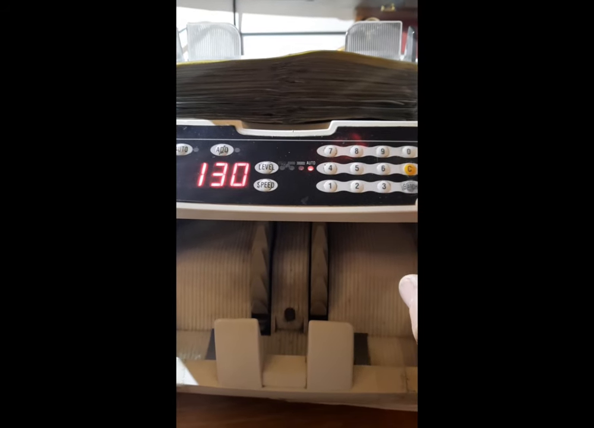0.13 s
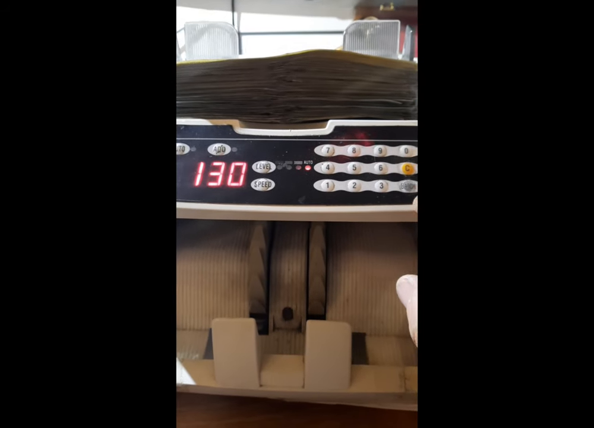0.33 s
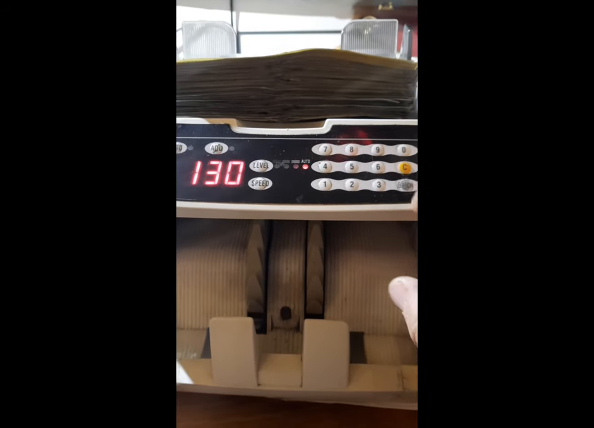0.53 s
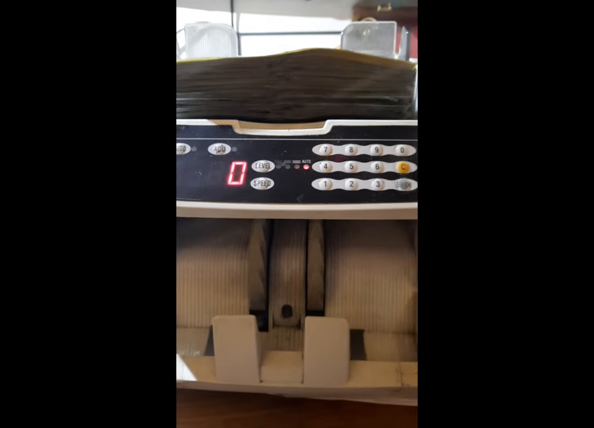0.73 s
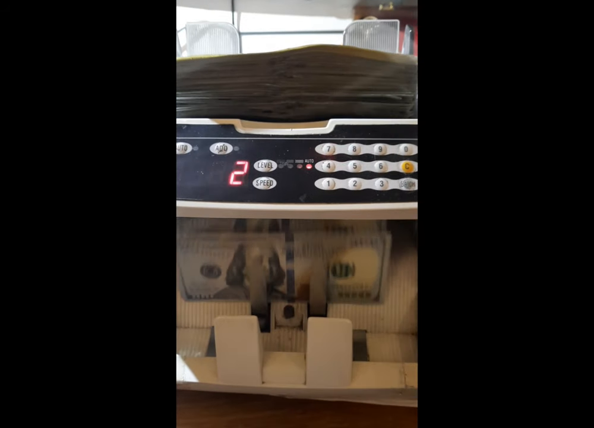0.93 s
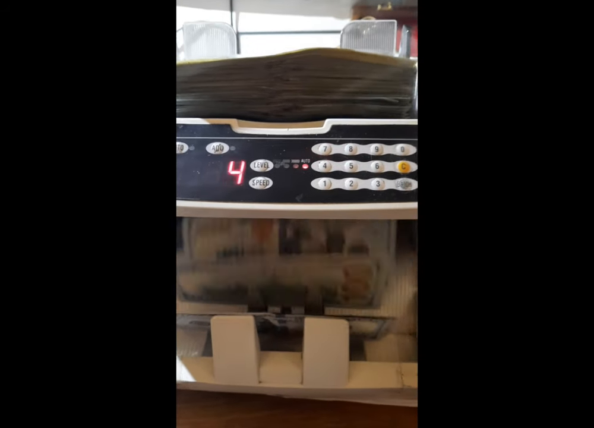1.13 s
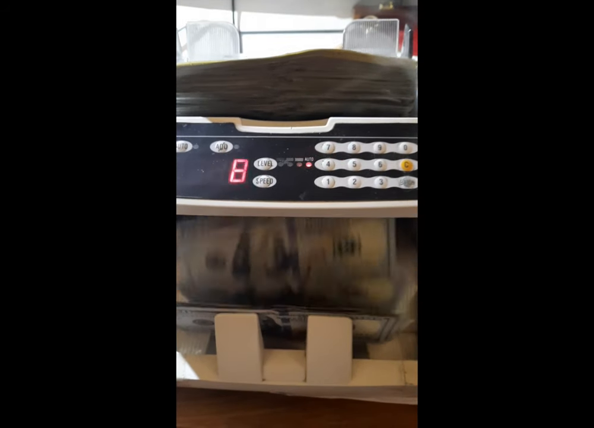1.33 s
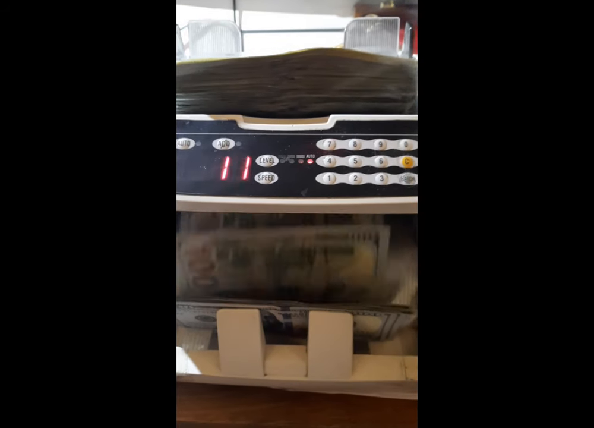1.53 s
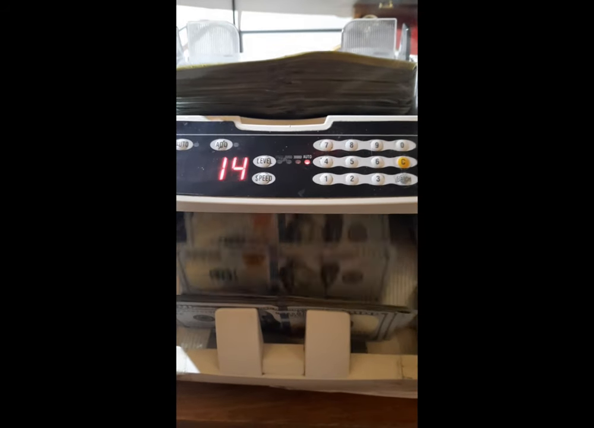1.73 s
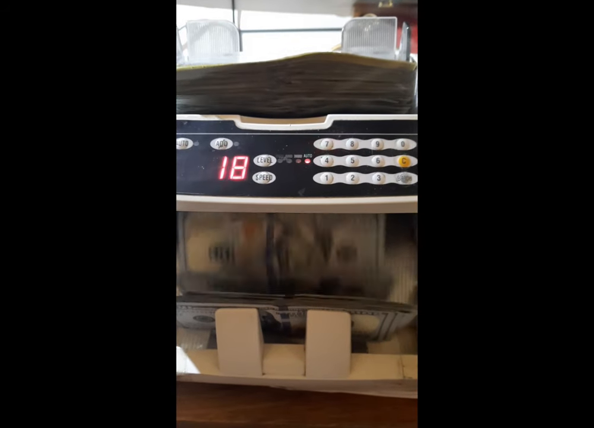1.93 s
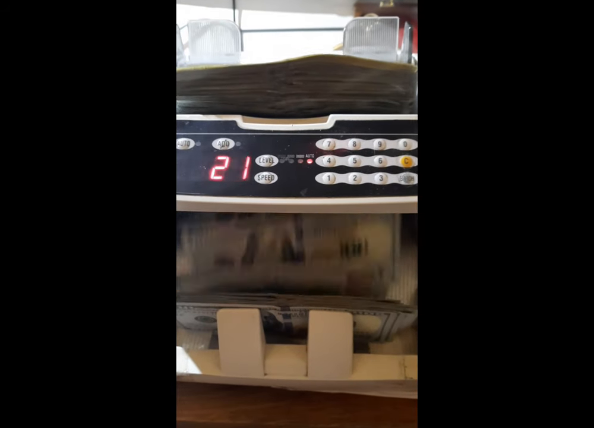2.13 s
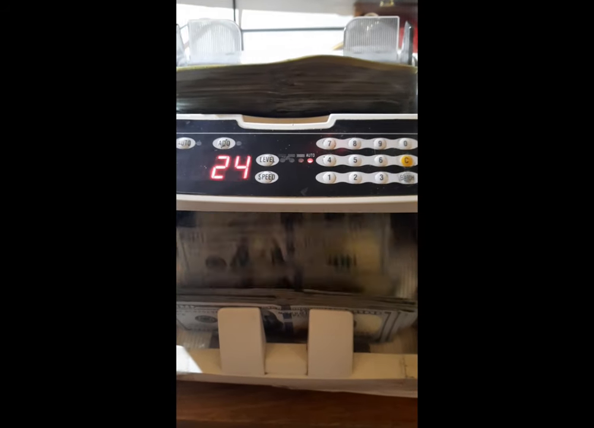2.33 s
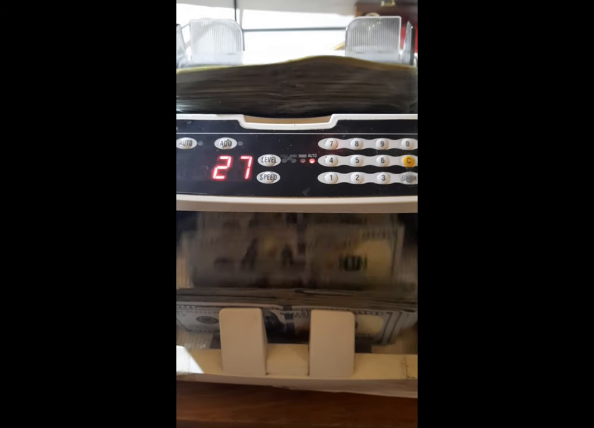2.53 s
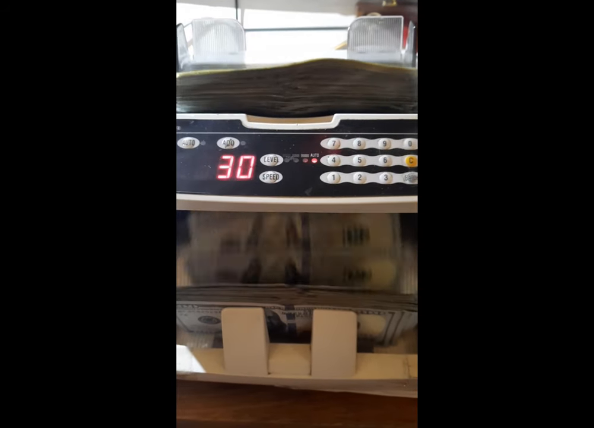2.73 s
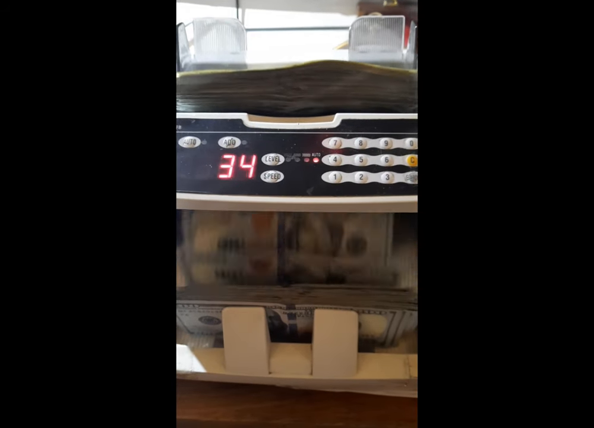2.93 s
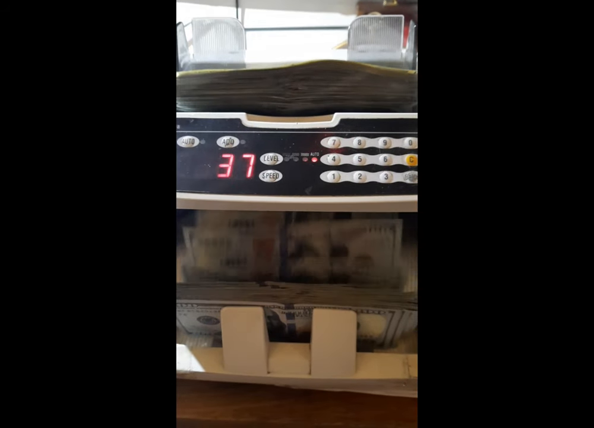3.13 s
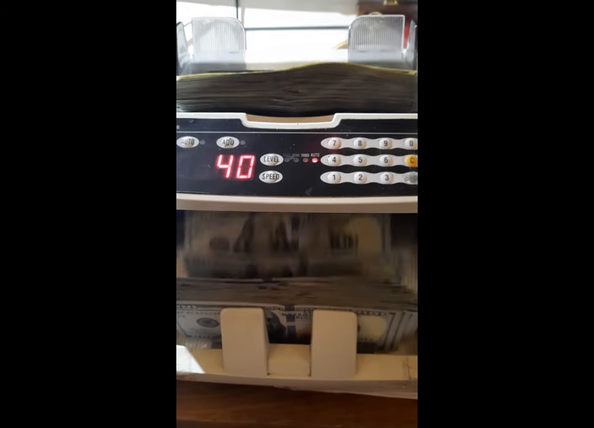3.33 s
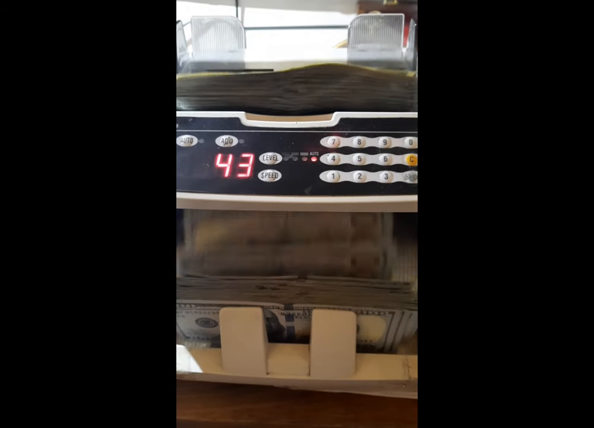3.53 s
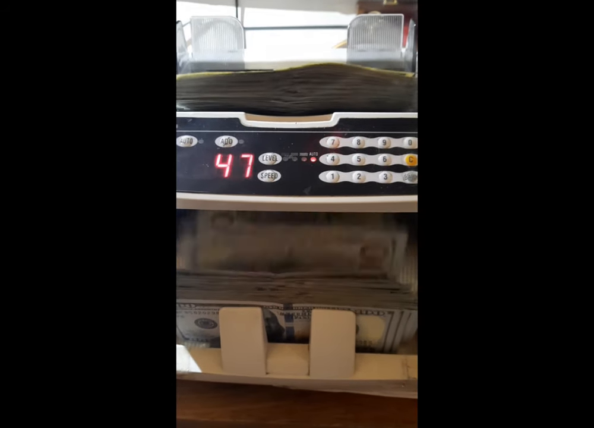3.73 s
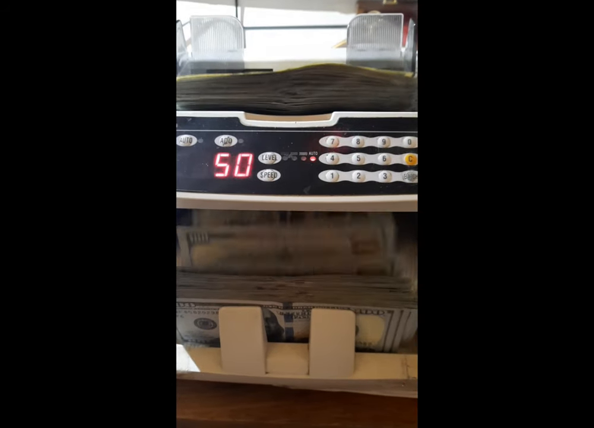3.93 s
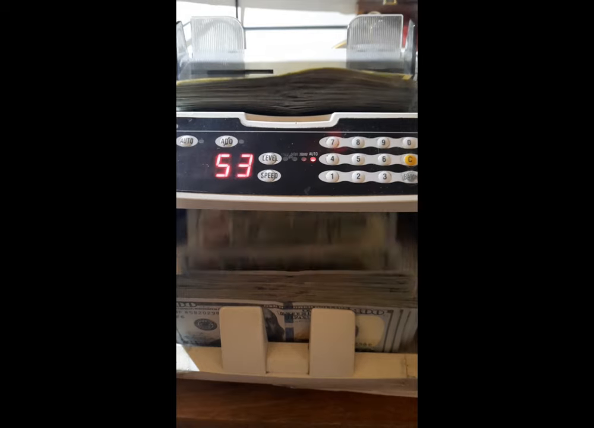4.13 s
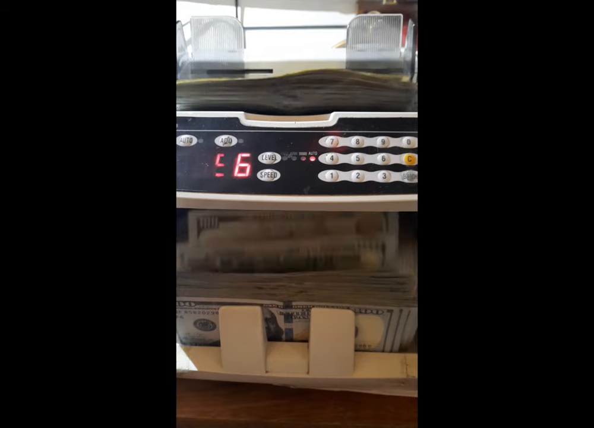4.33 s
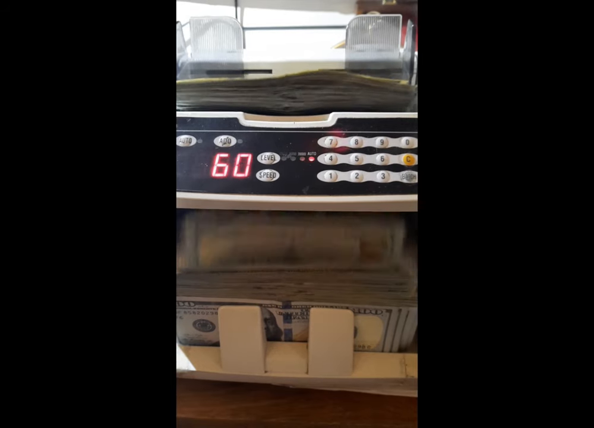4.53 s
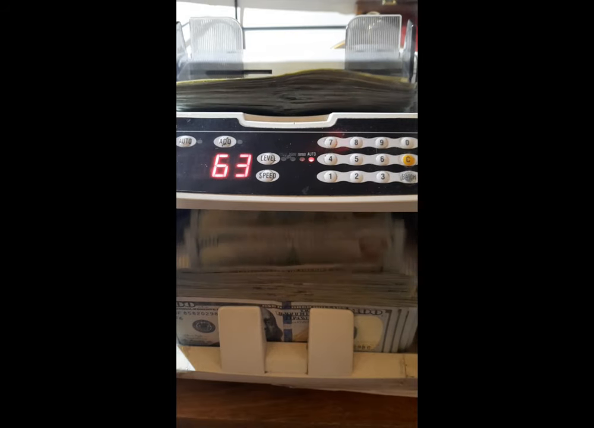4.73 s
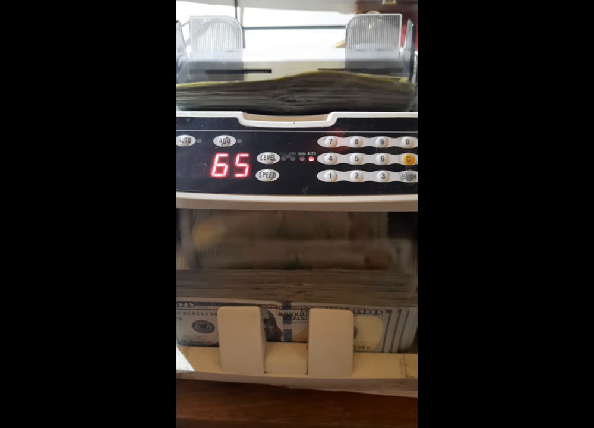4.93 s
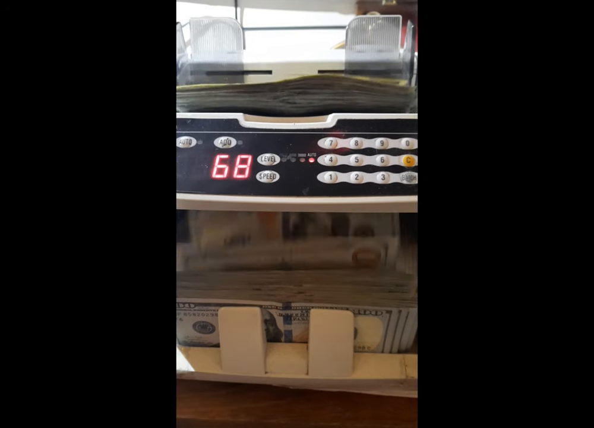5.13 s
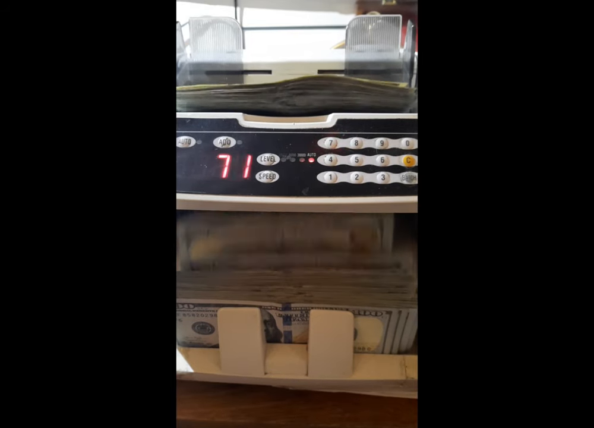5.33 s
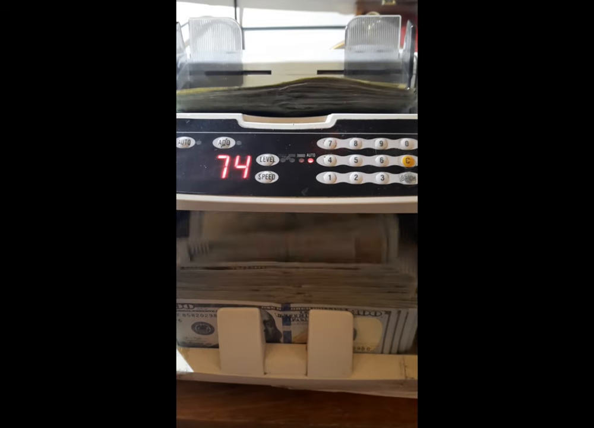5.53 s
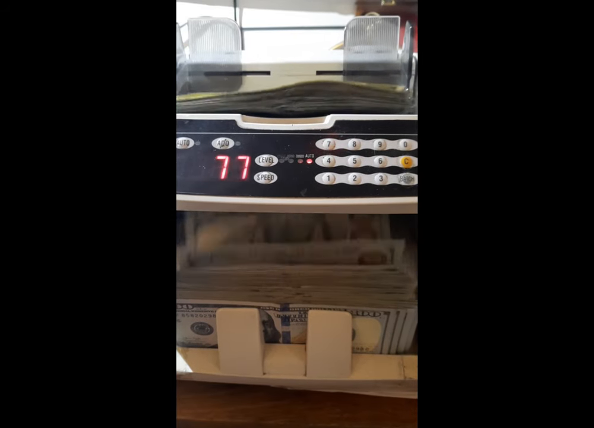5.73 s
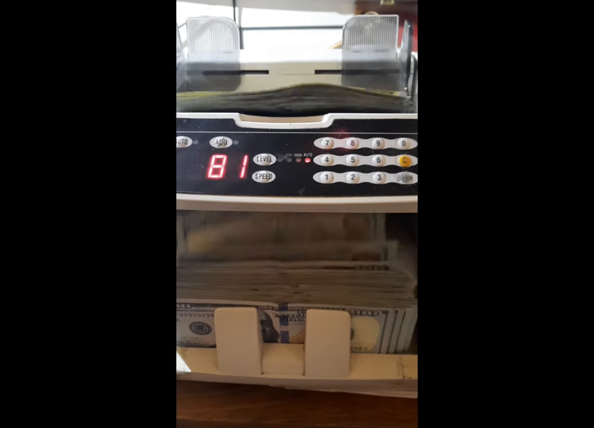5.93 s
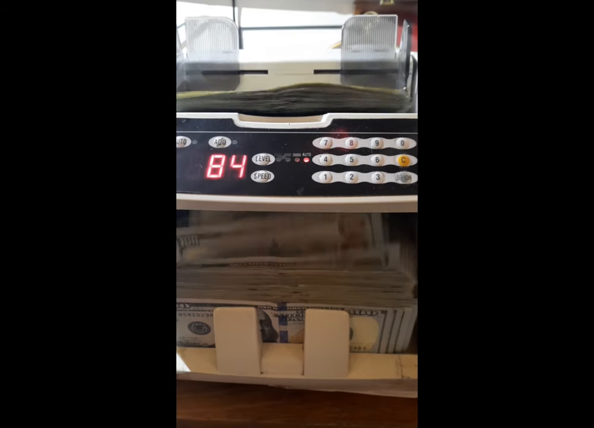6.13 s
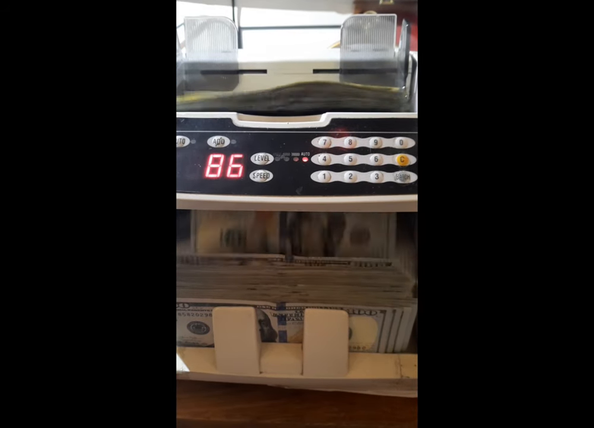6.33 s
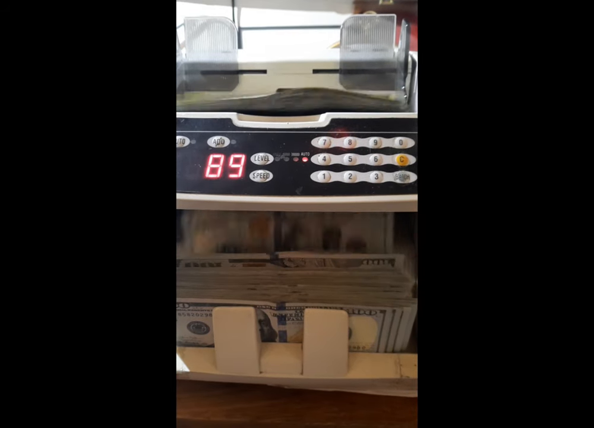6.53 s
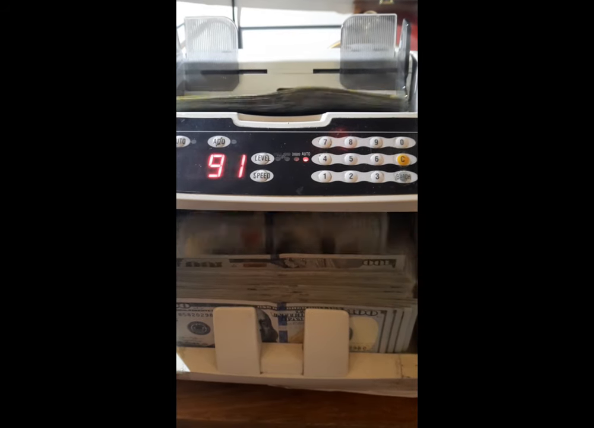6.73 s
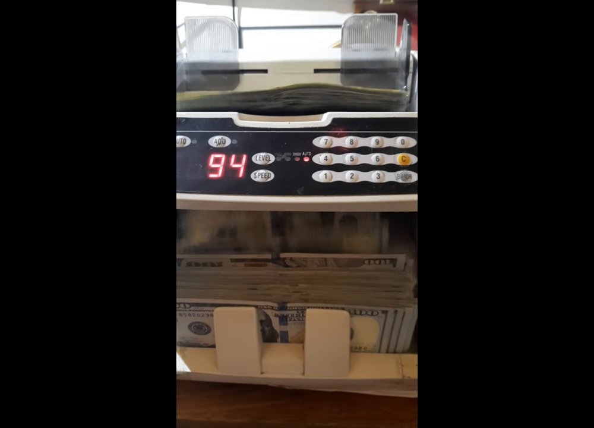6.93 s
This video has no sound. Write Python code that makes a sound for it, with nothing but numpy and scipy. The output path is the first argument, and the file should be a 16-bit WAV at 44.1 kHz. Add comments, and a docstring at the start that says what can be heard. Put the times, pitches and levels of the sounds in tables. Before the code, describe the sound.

A banknote counter runs on a desk, close to a pair of microphones in a quiet room. After a faint button click, the motor starts and the feed knocks as it bites into the stack. About sixteen bills a second flick through the rollers with a papery hiss, light knocks and small rubber squeaks, while the case hums and rattles. The rhythm holds to the end, broken by two very short dropouts midway.

```python
"""A banknote counter, close to a pair of microphones on a desk in a quiet room.
A key clicks, the drive spins up and rattles the plastic case, and about sixteen notes a second run through.
Each note swishes through the rollers and snaps free; between notes the feed knocks, ticks and squeaks.
The paper hiss sags when the feed misses; twice the sound drops out."""
import sys
import numpy as np
from scipy import signal
from scipy.fft import rfft, irfft, next_fast_len
from scipy.io import wavfile
from scipy.ndimage import uniform_filter1d

SR = 44100
rng = np.random.default_rng(int(sys.argv[2]) if len(sys.argv) > 2 else 0)


def transcribe(u):
    """Save the signal u as a 16-bit wav file named by the first command-line argument.

    u: samples, shape (n,) or (channels, n), limited to [-1, 1]; the rate is SR.
    q: integer samples, one column per channel.
    """
    v = np.clip(np.atleast_2d(u).T, -1, 1)
    q = np.round(v * 32767).astype(np.int16)
    wavfile.write(sys.argv[1], SR, q)


N = 307818
T = np.arange(N) / SR
PADDED = next_fast_len(N + 16384, True)
FREQ = np.maximum(np.fft.rfftfreq(PADDED, 1 / SR), 1)
ROLLER_HZ = 16.25

# Low panel resonances of the case. Each row: frequency in Hz, width in Hz, relative level in dB.
CASE_MODES = [(138.6, 23, -8.5), (188, 18, -16), (253, 14, -37), (296, 18, -6), (336.8, 47, 0.5),
              (372.8, 37, 0.5), (409, 16, -11.5), (563, 48, -11.5)]
# Resonances of the feed frame and chute. Each row: frequency in Hz, width in Hz, relative level in dB.
FRAME_MODES = [(377, 62, -6), (614, 57, -6), (867, 18, -10.5), (975, 121, 2), (1428, 153, -3.5),
               (1834, 128, 2), (2630, 90, -9), (4600, 680, -25), (6200, 600, -19)]
# Pace of the roller, which lets a note go on each whole turn. Each row: turns done, time in seconds.
ROLLER_PACE = [(0, 0.886), (1, 0.941), (9, 1.444), (17, 1.924), (24, 2.371), (31, 2.796), (36, 3.117),
               (41, 3.413), (51, 4.025), (53, 4.181), (58, 4.49), (59, 4.56), (60, 4.615), (70, 5.237),
               (84, 6.092), (86, 6.208), (93, 6.637), (99, 6.993)]
# The turns on which the feed finds no note.
MISSED_TURNS = [2, 66, 75, 90, 96, 98]


def undb(db):
    """Decibels to gain."""
    return 10 ** (np.asarray(db) / 20)


def unit(x):
    """Scale to rms 1."""
    return x / np.sqrt(np.mean(x ** 2))


def pan(x, left_db):
    """Lean a sound to the left or right."""
    return x * undb(np.array([[left_db], [-left_db]]) / 2)


def curve(points):
    """Join (Hz, value) points on a log-frequency axis."""
    hz, value = np.transpose(points)
    return np.interp(np.log(FREQ), np.log(hz), value)


def filtered(x, gain):
    """Apply a frequency response."""
    return irfft(rfft(x, PADDED) * gain, PADDED)[..., :N]


def walk(rate_hz):
    """A smooth random wander of rms 1."""
    return unit(filtered(rng.standard_normal(N), np.exp(-(FREQ / rate_hz) ** 2)))


def noise():
    """Noise at two microphones: alike in both from 100 to 350 Hz, mostly unrelated in the treble."""
    # Each row: frequency in Hz, correlation between the microphones.
    likeness = [(30, -0.8), (100, 1), (350, 1), (460, 0.71), (550, 0.31), (750, 0.58), (1300, 0.1),
                (1650, 0.27), (1880, 0.74), (2300, -0.017), (2900, -0.52), (4600, 0.17), (6500, -0.31),
                (9000, -0.015)]
    alike = np.clip(curve(likeness), -.99, .99)
    mid, side = filtered(rng.standard_normal((2, N)), np.sqrt([1 + alike, 1 - alike]))
    return unit(np.array([mid + side, mid - side]))


def crackle(spread_db, size=24):
    """Noise broken into half-millisecond grains of uneven strength."""
    strengths = np.clip(rng.standard_normal(N // size + 1), -2.5, 2.5)
    grains = np.repeat(strengths, size)[:N]
    return unit(noise() * undb(spread_db * grains))


def colour(x, points):
    """Causal filter through (Hz, dB) points that keeps the power of white noise."""
    cepstrum = irfft(np.log(unit(undb(curve(points)))), PADDED)
    cepstrum[1:PADDED // 2] *= 2
    cepstrum[PADDED // 2 + 1:] = 0
    return filtered(x, np.exp(rfft(cepstrum)))


def ring(x, modes):
    """Pass through (Hz, width, dB) resonances, keeping the power of white noise."""
    gain = sum(undb(db) / (1 + 1j * hz / width * (FREQ / hz - hz / FREQ)) for hz, width, db in modes)
    return filtered(x, gain / np.sqrt(np.mean(abs(gain) ** 2)))


def even(x, size=300):
    """Hold a rattle at constant power, so that only the force behind it sets its level."""
    return x / np.sqrt(uniform_filter1d(np.mean(x ** 2, axis=0), size) + 1e-9)


def taps(times, dbs):
    """One sharp push for each contact."""
    return np.bincount((np.asarray(times) * SR).astype(int), undb(dbs), N)


def bursts(times, dbs, rise, fall, size=4000):
    """Envelope of contacts that swell and die away exponentially; rise and fall are in seconds."""
    power = np.zeros(N)
    for s, db in zip(times, dbs):
        near = slice(max(int(s * SR) - size, 0), int(s * SR) + size)
        age = T[near] - s
        power[near] += undb(db) ** 2 * np.exp(2 * np.where(age < 0, age / rise, -age / fall))
    return np.sqrt(power)


def turn_time(turn):
    """The moment at which the roller reaches a given turn."""
    return np.interp(turn, *np.transpose(ROLLER_PACE))


def note_turns():
    """The turns that carry a note."""
    return np.setdiff1d(np.arange(ROLLER_PACE[-1][0]), MISSED_TURNS)


def each_turn(turns, phase, db, scatter_db, jitter_s):
    """Times and levels of a contact that comes a share (phase) into each turn, never quite alike."""
    late, strong = np.clip(rng.standard_normal((len(turns), 2)), -2, 2).T
    times = turn_time(turns + phase) + jitter_s * late
    return np.clip(times, 0, T[-1]), db + scatter_db * strong


def room_tone():
    """A low, steady murmur of air fills the room."""
    # Each row: frequency in Hz, relative level in dB.
    air_spectrum = [(15, -43), (25, -19), (43, -14), (108, -3.5), (200, -16), (242, -4.5), (301, -1),
                    (344, -14.5), (489, -17), (545, -26), (911, -32), (7920, -41.5), (9320, -39),
                    (14800, -39), (16000, -39)]
    return colour(noise(), air_spectrum) * undb(-65.5)


def start_key():
    """A fingertip brushes the panel and the key clicks."""
    brush = noise() * bursts([.45], [-76], rise=0.018, fall=.04, size=8000)
    click = noise() * bursts([.578], [-65], rise=.001, fall=.008)
    return (colour(brush, [(500, -20), (1500, 0), (3000, -2), (5000, -14), (16000, -22)])
            + colour(click, [(200, 3.5), (1500, -3), (4500, -14), (16000, -22)]))


def case_thuds():
    """Every note jolts the case and rings its panels; the first notes thump through the rollers."""
    # The start key, the drive engaging and heavy catches. Each row: time in seconds, strength in dB.
    catches = [(.579, -49), (.697, -38), (0.934, -22), (1.014, -21), (1.117, -19), (1.221, -16.5),
               (2.138, -14.5), (2.184, -17.5), (2.565, -12.5), (4.689, -16), (5.855, -13.5)]
    # Each row: frequency in Hz, relative level in dB.
    thump_spectrum = [(20, -24), (60, -5.5), (110, -2), (220, -1), (600, -32), (16000, -68)]
    light = each_turn(note_turns(), phase=0.041, db=-28, scatter_db=3, jitter_s=.003)
    jolts = taps(*np.hstack([light, np.transpose(catches)]))
    soft_jolts = filtered(jolts, np.exp(-(FREQ / 480) ** 2))
    thump = noise() * bursts([.931], [-26], rise=0.0037, fall=0.015)
    return ring(soft_jolts, CASE_MODES) * undb(20.5) + colour(thump, thump_spectrum)


def drive(drive_db, whine_db):
    """Gears and belt shake the case; the motor hums, and whines as it takes up the load."""
    # Swell of the hum. Each row: time in seconds, relative level in dB.
    hum_swell = [(0.85, -55), (0.91, -42), (1.33, -39.4), (1.75, -55), (1.93, -37.5), (3.07, -43),
                 (3.13, -50), (3.31, -42.6), (3.85, -53), (3.97, -38), (5.05, -41.5), (5.29, -35),
                 (5.77, -41), (5.83, -31), (5.89, -42.5), (6.91, -39.5)]
    # Each row: multiple of the roller speed, relative level in dB.
    hum_partials = [(7, -9), (8, 0), (21, -3), (24, -4), (29, -6.5), (37, -6)]
    # Each row: frequency in Hz, relative level in dB.
    rumble_spectrum = [(20, -47), (38, -38), (50, -27), (80, -11), (110, 2.5), (170, 3), (250, -5),
                       (500, -4), (1500, -35), (16000, -61)]
    # Each row: frequency in Hz, width in Hz, relative level in dB.
    whine_modes = [(1250, 35, 9), (1860, 86, 1.5), (2370, 160, -12)]
    turns = np.cumsum(ROLLER_HZ * (1 + .025 * walk(10))) / SR
    teeth = noise()[:, (turns % 1 * SR / ROLLER_HZ).astype(int)]  # the same roughness on every turn
    shake = (crackle(spread_db=2) + 0.49 * teeth) * undb(drive_db + walk(51))
    hum_db = np.interp(T, *np.transpose(hum_swell))
    hum = sum(undb(hum_db + db + 1.3 * walk(11)) * np.sin(2 * np.pi * k * turns)
              for k, db in hum_partials)
    rumble = colour(noise(), rumble_spectrum) * undb(-42)
    whine = ring(noise(), whine_modes) * undb(whine_db)
    return ring(shake, CASE_MODES) * undb(-30.5) + (hum + rumble) * undb(drive_db) + whine


def paper(rub_db):
    """Notes rub along their path, swish out of the rollers, snap against the frame and land."""
    # Slow course of the snaps and swishes. Each row: time in seconds, relative level in dB.
    snap_levels = [(0.89, -20.5), (1.5, -24.5), (2.73, -24.4), (3.05, -23), (3.35, -26), (3.72, -23),
                   (4.49, -25), (4.61, -22.5), (5.72, -26), (5.79, -24.0), (6.7, -28), (6.87, -22.5)]
    swish_levels = [(0.89, -26.0), (1.45, -31.5), (1.69, -26.5), (3.66, -25.5), (3.78, -21.5), (3.84, -38),
                    (4.03, -24.5), (4.25, -32), (4.86, -26.3), (5.05, -29.5), (6.33, -26.5), (6.87, -31.5)]
    # Stiff notes crack sharply as they leave. Each row: time in seconds, strength in dB.
    cracks = [(3.052, -23), (3.657, -23), (4.025, -20), (4.802, -25), (6.753, -26)]
    # Each row: frequency in Hz, relative level in dB.
    rub_spectrum = [(200, -23), (600, -4.5), (950, 7.5), (1200, 3.5), (1500, 8.5), (2000, 3), (2350, -0.5),
                    (2650, 3.5), (3200, -4.5), (4600, -3), (8500, -4), (9300, -11), (10500, -9.5),
                    (12000, -3.5), (14000, -2), (16000, -9.5)]
    swish_spectrum = [(500, -20.5), (2000, 3.5), (3200, 1.5), (4600, 5), (6000, 1.5), (8500, 2),
                      (9500, -11.5), (10700, -3), (12000, 3), (16000, -7)]
    snaps, uneven_db = each_turn(note_turns(), phase=0, db=0, scatter_db=1.45, jitter_s=.0004)
    snap_db = np.interp(snaps, *np.transpose(snap_levels)) + uneven_db
    swish_db = np.interp(snaps, *np.transpose(swish_levels)) + uneven_db
    # the rubbing sags 35 ms after each missed note
    sag_db = -8.5 * sum(np.exp(-((T - miss - 0.035) / 0.023) ** 2) for miss in turn_time(MISSED_TURNS))
    # just after a snap the rollers are empty for a moment
    gap = bursts(snaps + 0.016, np.zeros_like(snaps), rise=0.0077, fall=0.0092)
    lull = 1 - np.clip(.4 * gap, 0, .9)
    rub = colour(crackle(spread_db=2.5) * lull * undb(rub_db + sag_db + 1.28 * walk(60)), rub_spectrum)
    # the note flaps against the frame for a few milliseconds around its last sharp slap
    flap = even(ring(crackle(spread_db=1.5), FRAME_MODES))
    flap *= bursts(snaps + 0.00066, snap_db, rise=0.0049, fall=0.0039)
    slap = ring(taps(snaps, snap_db) + taps(*np.transpose(cracks)), FRAME_MODES)
    leaving = bursts(snaps, swish_db, rise=0.0081, fall=0.012)
    landings = each_turn(note_turns(), phase=0.33, db=-34, scatter_db=3.5, jitter_s=0.0018)
    settling = bursts(*landings, rise=0.015, fall=0.0035)
    swish = colour(crackle(spread_db=2.5) * np.hypot(leaving, settling), swish_spectrum)
    return rub * undb(-26) + flap * undb(5.5) + slap * undb(16) + pan(swish, left_db=0.98) * undb(5)


def rubber_squeaks():
    """Slipping rubber sings for a few milliseconds on an unsteady pitch, with or without a note."""
    # Loud squeaks as the rubber first takes hold. Each row: time in seconds, strength in dB.
    first_slips = [(0.802, -33.5), (0.876, -30), (0.991, -27)]
    pitch_hz = 4550 + 190 * walk(600)
    tone = np.sqrt(2) * np.sin(2 * np.pi * np.cumsum(pitch_hz) / SR)
    slips = each_turn(np.arange(2, ROLLER_PACE[-1][0]), phase=.735, db=-32, scatter_db=3, jitter_s=.0022)
    squeak = tone * bursts(*np.hstack([slips, np.transpose(first_slips)]), rise=0.0012, fall=0.0025)
    return pan(squeak, left_db=-11.5) * undb(1)


def stacker_ticks():
    """The edge of each note ticks into the stacker, to the right."""
    # Each row: frequency in Hz, relative level in dB.
    tick_spectrum = [(1000, -25), (4000, -3), (7000, 13), (8500, 13.5), (9700, -5.5), (12000, 16),
                     (16000, -27)]
    edges = each_turn(note_turns(), phase=0.512, db=-33.5, scatter_db=3.5, jitter_s=.0014)
    tick = colour(crackle(spread_db=3) * bursts(*edges, rise=0.0014, fall=0.0058), tick_spectrum)
    return pan(tick, left_db=-10) * undb(3)


def feed_knocks():
    """The feed wheels knock on each new note and set the frame chattering."""
    # Hard knocks, most as the feed bites into the stack. Each row: time in seconds, strength in dB.
    hard = [(0.918, -18), (0.965, -14), (0.996, -23), (1.115, -20), (1.191, -20), (1.221, -14.5),
            (1.26, -17), (2.148, -19.5), (2.338, -19), (2.826, -16.5), (3.515, -17.5), (3.576, -20),
            (4.64, -21), (4.7, -19.5)]
    # Each row: frequency in Hz, relative level in dB.
    knock_spectrum = [(100, -8), (400, 7), (900, -2), (1450, 4.5), (1900, -10.5), (4000, -6.5), (16000, -7)]
    chatter = even(colour(ring(crackle(spread_db=1), FRAME_MODES), knock_spectrum))
    light = each_turn(note_turns(), phase=0.585, db=-24.5, scatter_db=3, jitter_s=0.0082)
    force = bursts(*np.hstack([light, np.transpose(hard)]), rise=0.0019, fall=0.0046)
    return chatter * force * undb(2.5)


def reflections(x, t60=0.3, wet_db=-15, size=16384):
    """Desk and walls add a short, duller tail to the close sound."""
    age = T[:size]
    tail = noise()[:, :size] * np.exp(-np.log(1000) * age / t60) * (age > .003)
    tail = signal.lfilter([1], [1, -.4], tail)
    tail /= np.sqrt(np.sum(tail ** 2, axis=1, keepdims=True))
    return x + undb(wet_db) * signal.fftconvolve(x, tail, axes=1)[:, :N]


def scene():
    """The counter running on its desk, heard from close by."""
    # Run-up and running load. Each row: time in seconds, then gains in dB of drive, rubbing and whine.
    load = [(0, -90, -90, -110), (.69, -70, -92, -105), (.725, -24, -57, -66), (.74, -14.5, -36, -55),
            (.77, -15, -31, -42.5), (.81, -3.5, -10.5, -37.5), (.86, -1.5, -10.5, -31.5),
            (.89, 5.5, 7.5, -29), (.97, 4.5, 3, -42), (1.1, 1.5, 2.5, -46), (3.3, -0.5, 2, -47),
            (3.7, 0.5, 3, -36.5), (4.3, 0, -1, -45), (4.8, 0, 1.5, -49), (5.4, -1.5, 1.5, -46),
            (6.2, 1, 3, -59), (6.98, -1.5, 2, -50)]
    times, *gains = np.transpose(load)
    drive_db, rub_db, whine_db = (np.interp(T, times, db) for db in gains)
    counter = start_key() + paper(rub_db) + feed_knocks() + rubber_squeaks() + stacker_ticks()
    counter += drive(drive_db, whine_db) + case_thuds()
    return reflections(counter) + room_tone()


def record(dry):
    """Each microphone has its own colour; the sound drops out twice, and the top is cut at 16.1 kHz."""
    # Each row: frequency in Hz, left minus right in dB.
    balance = [(130, 0.5), (310, -2), (500, 3), (760, 8.5), (1030, -5), (1350, -4.5), (1680, 4), (2050, -5),
               (3400, 0), (6500, -7), (10000, 2), (12000, -0.5), (16000, -1.5)]
    # Each row: start and end in seconds.
    dropouts = [(2.961, 3.028), (4.076, 4.165)]
    heard = filtered(dry, undb(np.outer([.5, -.5], curve(balance))))
    dropped = sum((T > start) & (T < end) for start, end in dropouts)
    gain = uniform_filter1d(1 - dropped * (1 - undb(-54.5)), size=64)
    lowpass = signal.ellip(12, .2, 80, 16100, fs=SR, output="sos")
    return signal.sosfilt(lowpass, heard * gain)


dry = scene()
out = record(dry)
transcribe(out)
```